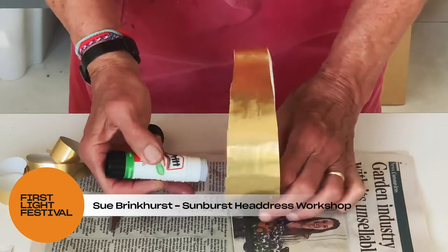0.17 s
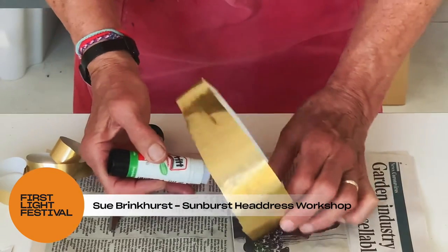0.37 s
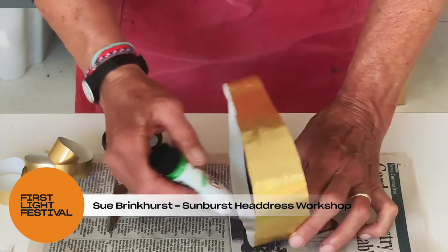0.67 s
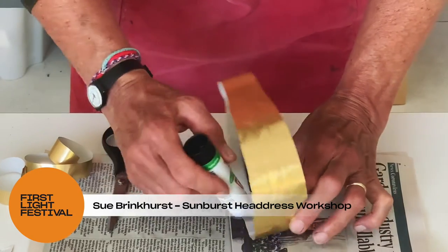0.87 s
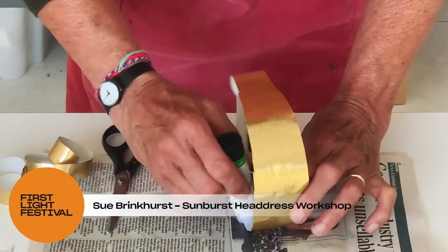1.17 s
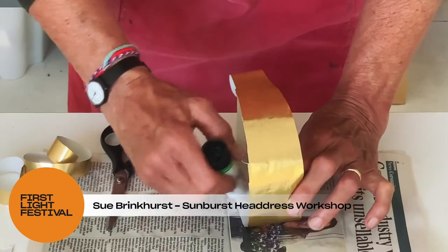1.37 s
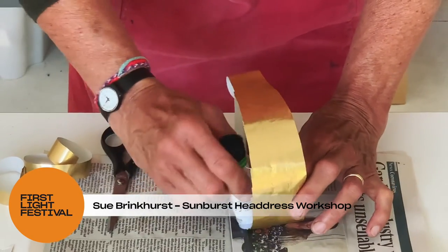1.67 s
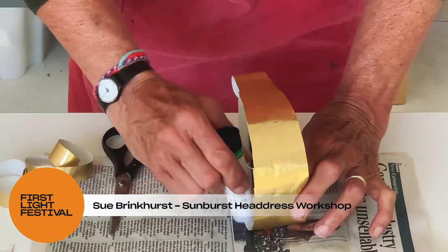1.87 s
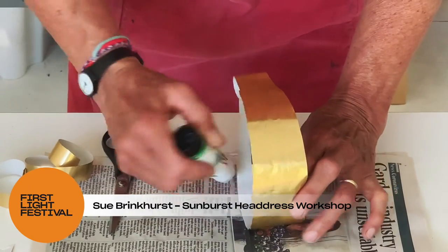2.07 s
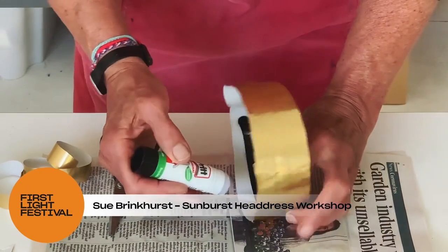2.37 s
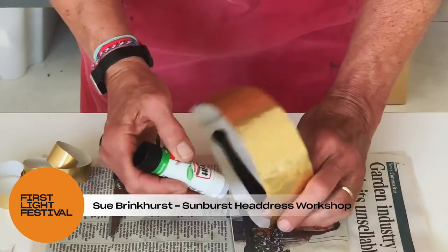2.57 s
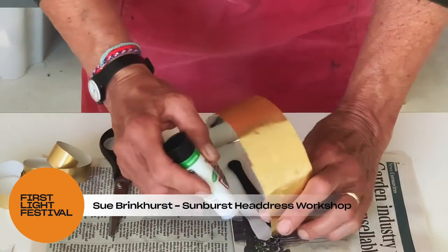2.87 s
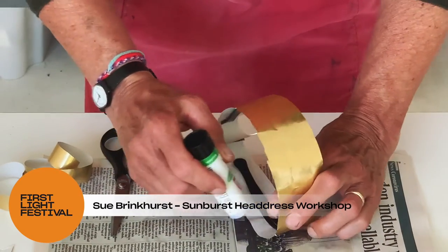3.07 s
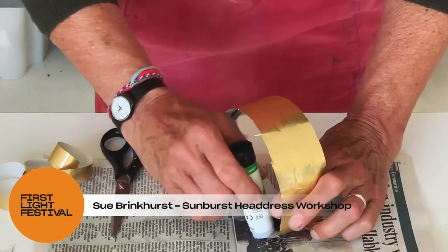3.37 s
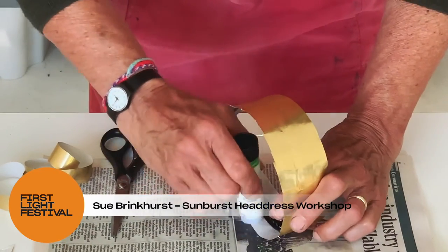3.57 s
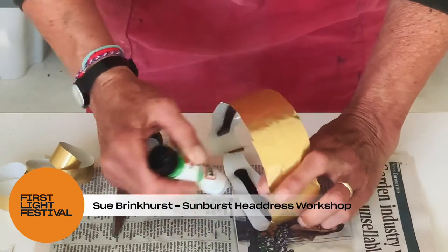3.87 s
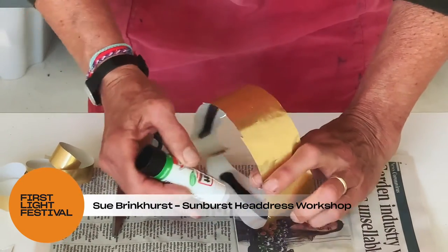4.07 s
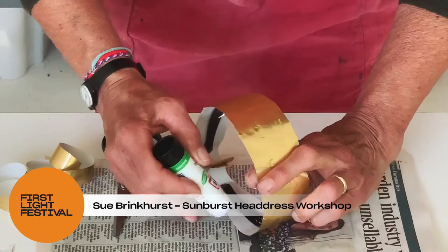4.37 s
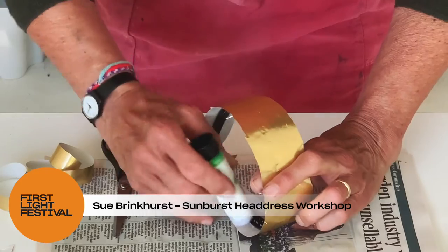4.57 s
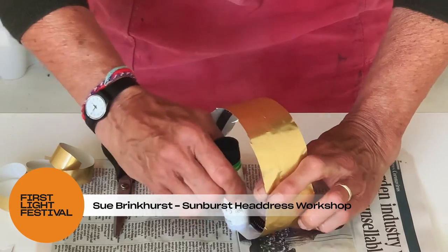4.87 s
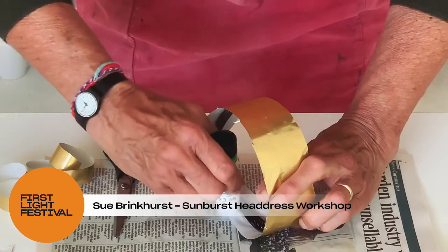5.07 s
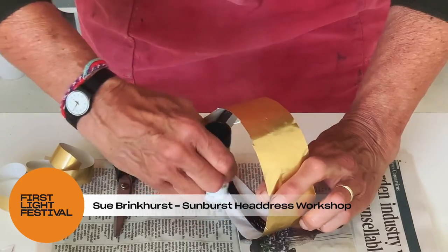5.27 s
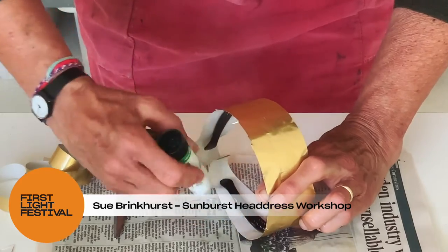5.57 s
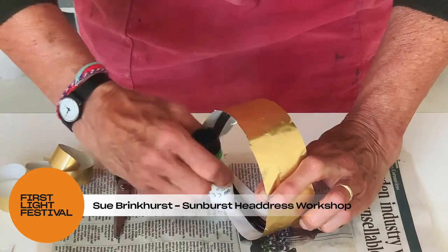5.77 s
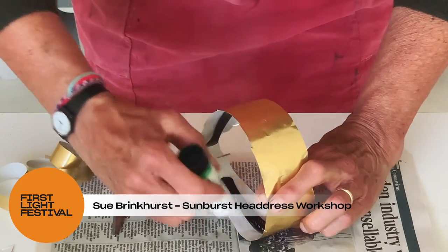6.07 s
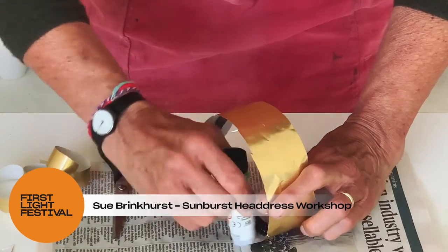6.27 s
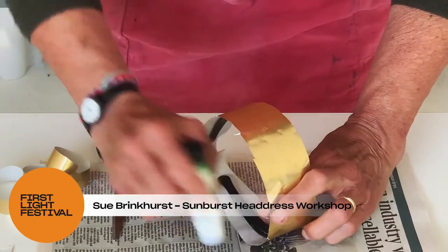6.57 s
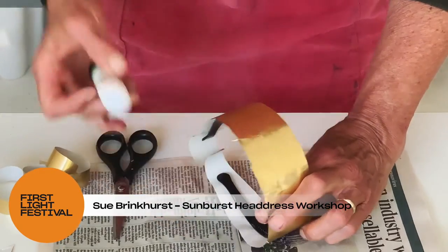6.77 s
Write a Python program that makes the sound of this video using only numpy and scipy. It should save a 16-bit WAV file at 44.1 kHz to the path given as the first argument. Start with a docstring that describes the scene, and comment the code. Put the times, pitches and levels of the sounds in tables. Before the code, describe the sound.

A headband covered in stiff metallic paper is handled on a table, heard by a close stereo microphone with short, lively indoor reflections. Crinkling opens loudly, thins to soft rubbing with muffled bumps, then returns as dense snapping and scraping. Later events are sparser: brief crackles, hollow plastic clicks, barely audible waxy wipes, a thin squeak and a firmer thump. A faint low hum and air noise continue underneath.

```python
"""Foil paper around a headband rustles, snaps and scrapes as a glue stick wipes its inside, on a table in a live room.
At first the stiff paper crackles and slides; hissing strokes of the stick and low table bumps follow, then a busy
run of snaps, with dull knocks of the rim. After a quieter spell comes a short burst of snaps, then the plastic case
clicks and faint strokes pass. Near the end come a narrow squeak, more bumps and a few last snaps and case clicks.
Paper, band, case and table are short dying tones, sliding is shaped noise, and a drone and air noise run throughout."""
import sys
import numpy as np
from scipy import signal
from scipy.fft import rfft, irfft, next_fast_len
from scipy.io import wavfile

SR = 44100
rng = np.random.default_rng(int(sys.argv[2]) if len(sys.argv) > 2 else 0)


def to_wav(sig):
    """Store sig (one row per channel, or 1-D mono) as 16-bit WAV at the path in sys.argv[1].

    Samples outside -1..1 are clipped; the rate is SR.
    """
    pcm = np.clip(np.atleast_2d(sig), -1, 1) * 32767
    pcm = np.round(pcm).astype(np.int16)
    wavfile.write(sys.argv[1], SR, pcm.T)  # frames by channels


N = 305118
TIME = np.arange(N) / SR


def from_db(db):
    """Turn decibels into a gain."""
    return np.exp(np.asarray(db) * np.log(10) / 20)


def rms_one(x):
    """Scale to unit power."""
    return x / np.sqrt(np.mean(x ** 2) + 1e-20)


def energy_one(x):
    """Scale to unit energy."""
    return x / np.sqrt(np.sum(x ** 2) + 1e-20)


def at_hz(points, hz):
    """Read a table between its rows, on a log-frequency axis."""
    f, value = np.transpose(points)
    return np.interp(np.log(hz), np.log(f), value)


def band(x, low, high):
    """Keep mainly the sound between two frequencies."""
    sos = signal.butter(2, [low, min(high, .48 * SR)], "band", fs=SR, output="sos")
    return signal.sosfilt(sos, x)


def half_octaves(low, count):
    """List half-octave bands as rows of lower edge, centre and upper edge."""
    return low * 2 ** ((np.arange(count)[:, None] + np.arange(3) / 2) / 2)


def drift(rate):
    """Wander slowly and randomly around zero with spread 1; a higher rate wanders faster."""
    step = 40  # samples between computed points
    r = np.exp(-2 * np.pi * step * rate / SR)
    slow = signal.lfilter([1], [1, -2 * r, r * r], rng.standard_normal(N // step + 1002))
    slow = slow[1000:]  # skip the filter's start-up
    return np.interp(np.arange(N) / step, np.arange(len(slow)), rms_one(slow))


def add(track, s, sound):
    """Mix a short sound into a track at a time in seconds."""
    start = min(max(0, int(s * SR)), N)
    track[start:start + len(sound)] += sound[:N - start]


def snap_ring(pitches, t60, spread_s):
    """A sharp sound comes in a few quick steps, each ringing one short-lived mode."""
    starts = spread_s * rng.exponential(1, (len(pitches), 1))
    age = np.maximum(TIME[:SR // 80] - starts + starts.min(), 0).astype("float32")
    tones = np.sin(2 * np.pi * pitches[:, None].astype("float32") * age)
    modes = tones * from_db(-60 * age / t60)
    return rng.normal(0, 1, len(pitches)) @ modes


# Sharp snaps of paper and, near 4.04 and 6.78 s, clicks of the plastic case. Each row: start in seconds,
# main pitch in Hz (of the loose flap, for paper), level in dB before mixing,
# treble slope in dB per octave, typical time over which its steps spread in seconds.
SHARP_SNAPS = [(0.0031, 2226, -29, 0.5, 0.0012), (0.0088, 3050, -33.5, 1.5, .0007),
               (0.0165, 3400, -43, -2, .003), (0.2236, 2320, -40, -11.5, .0003),
               (0.2452, 2470, -48.5, 4.5, 0.0013), (0.4326, 1310, -42, 3.5, 0.00073),
               (0.7536, 2800, -61, 1.5, .0015), (1.1449, 1070, -52, -23, 0.00085),
               (1.1963, 1440, -51, -13, 0.0012), (1.2583, 2540, -37.5, -32, 0.00042),
               (1.3448, 1230, -31, -11, .0015), (1.3612, 2070, -36.5, -11.5, 0.000416),
               (1.3758, 2610, -31.5, -0.5, 0.00053), (1.9131, 1270, -32.5, -28, 0.00037),
               (1.9165, 2230, -37, -22, 0.00138), (1.9553, 2470, -33, -21, 0.0016),
               (1.964, 2680, -40.5, -6.5, 0.0013), (1.9847, 1510, -36, -29, .001),
               (1.9885, 2220, -33, -30, .0015), (2.0616, 1160, -44, -5, .001), (2.171, 2930, -42, 4, .0005),
               (2.2131, 1440, -38.5, 1, 0.00071), (2.2498, 4020, -48.5, 8.5, .0005),
               (2.3442, 2036, -39, -2, 0.0012), (2.3636, 3140, -36.5, -7.5, .002),
               (2.4446, 900, -38.5, -13.5, 0.00046), (2.5035, 2270, -39.5, -4.5, 0.0011),
               (2.5247, 2210, -36, 5, 0.000772), (2.5302, 2390, -43.5, 3, 0.0018),
               (2.6288, 3940, -44, 2, 0.00078), (2.8037, 1050, -50, -1.5, .0006),
               (2.809, 1730, -50, -20, .0015), (2.9037, 3350, -58, 3.5, 0.00038),
               (3.3442, 1401, -56, -20, .002), (3.4096, 1180, -62, -21, .001),
               (3.4613, 1050, -68, -26.5, 0.0015), (3.4849, 1500, -56, -29, 0.0013),
               (3.547, 1357, -39, 1.5, 0.0012), (3.5545, 1290, -36, -2.5, 0.0015),
               (3.5600, 10100, -55, 14, .002), (3.5643, 900, -33.5, -3.5, .0015),
               (3.5697, 10360, -35.5, 7.5, .0006), (3.5759, 1240, -38, -19.5, 0.0012),
               (3.6497, 2300, -40, -13, .0015), (3.6559, 2490, -39.5, 2.5, .0005),
               (3.7932, 1250, -41.5, -11, .0007), (3.8265, 2540, -43, -9, .001),
               (3.9428, 971, -53.5, 2.5, .0015), (4.0393, 3950, -41.5, -4.5, 0.000202),
               (5.2146, 8140, -48.5, 14, .0008), (5.2175, 1065, -34.5, -2.5, .002),
               (5.2588, 4600, -42.5, 4, 0.0018), (5.2645, 3740, -52, 8.5, .0015),
               (5.371, 3020, -47, -6.5, 0.00094), (5.8443, 9850, -53, 5, .0015),
               (5.8952, 958, -45.5, 2.5, .0015), (6.1955, 1210, -46, -29.5, 0.001026),
               (6.1962, 2790, -46, -25, 0.0007), (6.4723, 2235, -43.5, -24, .001),
               (6.478, 2690, -54, -18.5, 0.0017), (6.5095, 2870, -68.5, -22, 0.00085),
               (6.6846, 8900, -80, 20.5, 0.0018), (6.7738, 3740, -39.5, 3, .001),
               (6.777, 4500, -41, 2.5, 0.000617), (6.7795, 2230, -38.5, -1, 0.0013)]
FLAP_BOOST_DB = 6.5  # extra level in a zone that holds the main pitch
TREBLE_FROM_HZ = 2590  # the treble slope starts here


def snaps(rows, ring_s=0.0017, ring_slope=1.0, flap_db=-3, gather=0.69):
    """Sharp snaps and clicks are broad cracks, longer in the lows, plus a knock at the main (flap) pitch."""
    out, t = np.zeros(N), TIME[:SR // 80]
    flap_t60 = .006  # seconds to fall by 60 dB
    # each zone: from Hz, to Hz, level in dB
    zones = [(637, 2045, -4.5), (1760, 4720, 0.07), (3608, 9760, -0.5), (9300, 14800, -7.0)]
    times, flap_hz, level_db, slope, steps_s = np.transpose(rows)
    flaps = np.array([energy_one(np.sin(2 * np.pi * hz * t) * from_db(-60 * t / flap_t60))
                      for hz in flap_hz])
    for low, high, zone_db in zones:
        # the knock rings in a zone that holds its pitch, and the modes there gather around it
        holds = ((low <= flap_hz) & (flap_hz < high))[:, None]
        pitches = np.linspace(low, high, num=20)
        pitches = pitches + gather * holds * (flap_hz[:, None] - pitches)
        t60 = ring_s * (2000 / low) ** ring_slope
        cracks = np.array([energy_one(snap_ring(p, t60, step_s))
                           for p, step_s in zip(pitches, steps_s)])
        with_flap = cracks + from_db(flap_db) * holds * flaps
        sounds = band(band(with_flap, low, high), low, high)
        octaves_up = max(0, np.log2(np.sqrt(low * high) / TREBLE_FROM_HZ))
        strengths = from_db(level_db + zone_db + slope * octaves_up + FLAP_BOOST_DB * holds[:, 0])
        for s, strength, sound in zip(times, strengths, sounds):
            add(out, s, strength * energy_one(sound))
    return out


LEAD_S = 0.0072  # the paper starts to stir this long before it slides
SWELL_SHARE, SAG_DB, RELEASE_DB_PER_S = 0.2, 5, 278.5  # share of the length, loss over it, fall after it


def rustle_envelope(length):
    """One slide of the paper swells roundly, sags a little, then dies away."""
    t = np.arange(-LEAD_S, length + 60 / RELEASE_DB_PER_S, 1 / SR)
    rise = np.minimum((t + LEAD_S) / (LEAD_S + SWELL_SHARE * length), 1)
    swell = np.sin(np.pi / 2 * rise) ** 2
    sag_db = SAG_DB * np.clip(t / length, 0, 1)
    release_db = RELEASE_DB_PER_S * np.maximum(t - length, 0)
    return swell * from_db(-sag_db - release_db)


# The band is turned or pressed and its paper slides. Each row: start in seconds, length in seconds,
# level in dB before mixing, tilt in dB per octave.
PAPER_SLIDES = [(0.0, 0.15, -42.5, 2), (0.195, 0.11, -43, 5), (0.3, .13, -40, 4), (0.434, 0.055, -48, 1),
                (0.637, 0.085, -56.5, 5.5), (1.094, 0.39, -64.5, -1), (1.328, 0.17, -57, -2),
                (1.649, 0.058, -63, 4.5), (1.935, 0.2, -50, -4.5), (2.099, 0.23, -48, 3),
                (2.304, 0.8, -61, -1), (2.542, 0.073, -39.5, 4), (2.621, 0.38, -66.5, -1.5),
                (2.854, 0.069, -66, 3.5), (3.32, 0.06, -67, -4), (3.544, 0.14, -38.5, 0),
                (3.7, 0.28, -63, -2), (3.922, 0.054, -53.5, -2.5), (4.066, 0.26, -64, -1.5),
                (4.268, 0.033, -61.5, 5), (4.627, 0.2, -66.5, 3.5), (4.881, 0.084, -57.5, 2),
                (5.113, 0.02, -63, 6.5), (5.214, 0.041, -45.5, 10), (5.274, 0.15, -48.5, 5),
                (5.577, 0.38, -68, -7), (5.816, 0.094, -50, 5.5), (5.937, 0.028, -52, 5),
                (6.227, 0.043, -56.5, 9.5), (6.516, 0.03, -52.5, 3), (6.686, 0.057, -49, 5),
                (6.802, 0.16, -56.5, -2.5)]
# Colour shared by all rustles. Each row: frequency in Hz, level in dB.
PAPER_COLOUR = [(300, -6.5), (450, 2), (750, -8), (1200, -6.5), (2100, -4.5), (3200, -6.5), (4500, -7),
                (6500, -7), (10000, -1), (14000, -5)]
TILT_PIVOT_HZ, ARCH_DB = 2730, 2  # the tilt turns about the pivot; both ends droop by the arch times octaves squared


def rustle(grains_per_s=600, size_db=2.0, clump_db=5.5, slide=0.68, patchy_db=6.0):
    """Tiny creases tick in clumps over the smooth slide of paper; the colour shifts as the sheet bends."""
    sizes_db = size_db * np.minimum(rng.exponential(1, N), 4)
    clumps_db = clump_db * np.minimum(drift(71), 1)
    grains = from_db(sizes_db + clumps_db) * (rng.random(N) < grains_per_s / SR)
    ticking = rms_one(grains * rng.standard_normal((2, N)))
    textures = ticking + slide * rng.standard_normal((2, N))
    envelopes = [rustle_envelope(row[1]) for row in PAPER_SLIDES]
    out = np.zeros(N)
    for k, (low, hz, high) in enumerate(half_octaves(250, count=12)):
        octaves, gain = np.log2(hz / TILT_PIVOT_HZ), np.zeros(N)
        for (s, _, level_db, tilt), envelope in zip(PAPER_SLIDES, envelopes):
            add(gain, s - LEAD_S, envelope * from_db(level_db + tilt * octaves))
        # neighbouring bands use different noise, and each comes and goes by itself
        patches = from_db(patchy_db * np.tanh(drift(42)))
        texture = rms_one(band(textures[k % 2], low, high) * patches)
        colour = from_db(at_hz(PAPER_COLOUR, hz) - ARCH_DB * octaves ** 2)
        out += texture * gain * colour
    return out


TICK_DB, TICK_SPREAD_DB = -16.5, 6.5  # level relative to the rustle's table level, and its spread either way
TICK_HZ = (940, 4800)  # lowest and highest flap pitch
TICK_STEP_S = .0005  # they give way almost at once


def stray_ticks(count=2):
    """Each rustle lets a few small creases go at random moments; returns rows as for the snaps."""
    rows = []
    lowest, highest = TICK_HZ
    for s, length, level_db, tilt in PAPER_SLIDES:
        for when, pitch, size in rng.random((count, 3)):
            hz = lowest * (highest / lowest) ** pitch
            tick_db = level_db + TICK_DB + TICK_SPREAD_DB * (2 * size - 1)
            rows.append((s + when * length, hz, tick_db, tilt, TICK_STEP_S))
    return rows


# Rough scraping tones; those near 5.3 s are resonances ringing on after snaps. Each row: start in seconds,
# length in seconds, first pitch in Hz, last pitch in Hz, level in dB before mixing.
ROUGH_TONES = [(0.064, 0.035, 550, 535, -46), (0.284, 0.19, 2170, 1850, -48.5),
               (0.314, 0.14, 1337, 1292, -59.5), (0.439, 0.05, 370, 330, -65),
               (2.077, 0.053, 440, 390, -52), (2.656, 0.19, 2060, 1700, -57.5),
               (2.682, 0.11, 620, 430, -59), (2.447, 0.05, 760, 640, -55.5),
               (2.798, 0.13, 1050, 1100, -63.5), (3.338, 0.036, 1600, 1500, -67),
               (3.402, 0.1, 1662, 1750, -67), (3.456, 0.047, 860, 1000, -63.5),
               (3.955, 0.049, 452, 565, -55), (4.273, 0.025, 2960, 3000, -59.5),
               (5.248, 0.21, 1130, 1250, -54), (5.278, 0.17, 4650, 4600, -53.5),
               (5.292, 0.16, 3800, 3700, -60)]


def rough_tones(slips_per_s=210, size_db=7.5, scatter=0.066, ring_cycles=22):
    """Uneven little pulses each ring a short tone, whose pitch moves from first to last."""
    out, t = np.zeros(N), TIME[:SR // 25]
    for s, length, first_hz, last_hz, level_db in ROUGH_TONES:
        gaps = rng.uniform(.2, 1.8, 80)
        sizes, detunes = rng.standard_normal((2, 80))
        for when, size, detune in zip(np.cumsum(gaps) / slips_per_s, sizes, detunes):
            if when < length:
                hz = (first_hz + (last_hz - first_hz) * when / length) * np.exp(scatter * detune)
                pulse = energy_one(np.sin(2 * np.pi * hz * t) * from_db(-60 * t * hz / ring_cycles))
                strength = from_db(level_db + size_db * size) * np.sqrt(SR / slips_per_s)
                add(out, s + when, pulse * strength)
    return out


# The rim of the band knocks dully on the table. Each row: start in seconds, pitch in Hz,
# level in dB before mixing.
RIM_KNOCKS = [(0.433, 444, -47), (1.3591, 917, -62), (1.3755, 918, -34.5), (1.38, 490, -47.5),
              (2.0618, 514, -45.5), (2.171, 804, -42), (2.3636, 777, -51.5), (2.4434, 682, -50),
              (2.6288, 584, -55.5), (3.4865, 616, -58), (5.2148, 453, -42.5), (6.478, 928, -37)]


def knocks(ring_s=0.015, spread_s=0.00084, lowest=0.58, highest=1.5):
    """Each knock rings a cluster of the band's low, quickly damped modes."""
    out = np.zeros(N)
    for s, hz, level_db in RIM_KNOCKS:
        ring = snap_ring(hz * np.linspace(lowest, highest, num=12), ring_s, spread_s)
        add(out, s, from_db(level_db) * energy_one(band(ring, hz * lowest, hz * highest)))
    return out


def moving_resonance(hz, width):
    """Noise in one resonance whose centre moves; it forgets its phase faster where it is wider."""
    cycles = np.cumsum(width) / SR
    knots = rng.standard_normal((2, SR // 10))
    along, across = [np.interp(cycles, np.arange(len(k)), k) for k in knots]
    phase = 2 * np.pi * np.cumsum(hz) / SR
    return rms_one(along * np.cos(phase) + across * np.sin(phase))


# The stick is wiped along. Each row: start in seconds, length in seconds, first hiss pitch in Hz,
# settled hiss pitch in Hz, settling time in seconds, width in Hz before the spread factor,
# level in dB before the judder and mixing.
STICK_STROKES = [(0.815, 0.97, 4095, 3620, 0.46, 464.5, -62), (1.438, 0.49, 3943, 3397, .3, 450.4, -57.5),
                 (3.02, 0.11, 6940, 7050, 0.051, 503, -69.5), (4.423, 0.46, 3470, 3280, 0.066, 294, -78.5),
                 (4.61, 0.27, 3970, 4330, 0.084, 398, -68.5), (4.981, 0.44, 6740, 7250, 0.15, 202, -73),
                 (5.529, 0.27, 4360, 4540, 0.055, 425, -65.5), (5.617, 0.205, 4270, 3660, 0.028, 59.4, -59)]


def glue_strokes(fade_s=0.041, judder_db=2.0, spread=3.3):
    """The waxy tip slides with a hiss whose pitch settles as it beds in; a narrow hiss is a squeak of grip."""
    out = np.zeros(N)
    for s, length, first_hz, settled_hz, settling_s, width, level_db in STICK_STROKES:
        t = np.arange(0, length, 1 / SR)
        hz = settled_hz + (first_hz - settled_hz) * np.exp(-t / settling_s)
        contact = np.clip(np.minimum(t, length - t) / fade_s, 0, 1)
        hiss = moving_resonance(hz, np.full(len(t), spread * width))
        add(out, s, hiss * contact * from_db(level_db))
    return out * from_db(judder_db * drift(39))


# The stick's plastic case clicks. Each row: start in seconds, level in dB before mixing.
STICK_CASE_CLICKS = [(4.0393, -45), (5.2146, -47.5), (5.2645, -46.5), (6.777, -42.5)]
# Tones of the case. Each row: pitch in Hz, strength in dB, time to fall by 60 dB in seconds.
CASE_TONES = [(2160, -13, 0.059), (2860, -6.5, 0.055), (3640, -6, 0.12), (3750, -9.5, 0.26),
              (3840, 9.5, 0.005), (4050, 1, 0.027), (4400, 9, 0.0062), (4570, -9, 0.077), (4870, -11, 0.05),
              (5560, -9, 0.03), (6030, -13, 0.03)]


def case_clicks():
    """The hollow plastic case rings on briefly in its own tones after a click."""
    out, t = np.zeros(N), TIME[:SR // 4]
    hz, mode_db, t60 = np.array(CASE_TONES).T[:, :, None]
    ring = (from_db(mode_db - 60 * t / t60) * np.sin(2 * np.pi * hz * t)).sum(axis=0)
    for s, level_db in STICK_CASE_CLICKS:
        add(out, s, from_db(level_db) * ring)
    return out


# Pressing down bumps the table. Each row: start in seconds, level in dB before mixing, low cut in Hz,
# contact cut-off (high cut) in Hz, time for the load to build in seconds.
TABLE_BUMPS = [(1.026, -24, 90.6, 173, 0.004), (1.588, -24.5, 86.5, 170, 0.0023),
               (3.333, -31.5, 105, 85, 0.011), (4.035, -52, 92, 109, 0.0024),
               (5.218, -44, 201, 403, 0.0027), (5.776, -27, 105, 272, 0.0016),
               (6.477, -21, 100, 480, 0.0012), (6.514, -29.5, 170, 480, 0.0012),
               (6.574, -34.5, 240, 400, 0.002), (6.683, -37, 91.6, 190, 0.0018)]
# Tones of the table top. Each row: pitch in Hz before small random detuning, strength in dB before
# random variation, time to fall by 60 dB in seconds.
TABLE_TONES = [(124, -2.5, 0.12), (152, -8, 0.15), (204, -6, 0.3), (250, -4, 0.07), (268, -2, 0.2),
               (341, -11, 0.22), (430, -8.5, 0.19), (500, -8, 0.19), (568, -10, 0.14), (630, -18, 0.1),
               (680, -23, 0.1), (918, -27, 0.2)]


def bumps(spot_db=2.5, detune=0.0085, settle_db=-8.5, settle_s=0.024, settle_loss_db=3, count=3):
    """Soft blows through the hand ring the table's low modes; a firmer contact reaches the higher ones."""
    out, t = np.zeros(N), TIME[:SR // 2]
    hz, mode_db, t60 = np.array(TABLE_TONES).T[:, :, None]
    for s, level_db, lowest_hz, contact_hz, build_s in TABLE_BUMPS:
        contact = np.vstack([signal.butter(2, contact_hz, fs=SR, output="sos"),
                             signal.butter(4, lowest_hz, "high", fs=SR, output="sos")])
        # the hand lands, then settles in uneven weaker touches
        delays = np.cumsum(settle_s * rng.uniform(.5, 1.5, count))
        settling = zip(delays, settle_db - settle_loss_db * np.arange(count))
        for late_s, touch_db in [(0.0021, 0.0081)] + list(settling):
            # each touch meets another spot and loads the modes differently
            spot, load = rng.standard_normal((2, len(TABLE_TONES), 1))
            strengths = from_db(mode_db + spot_db * spot - 60 * t / t60)
            modes = strengths * np.sin(2 * np.pi * hz * (1 + detune * load) * t)
            blow = modes.sum(axis=0) * (1 - np.exp(-t / build_s))
            add(out, s + late_s, from_db(level_db + touch_db) * signal.sosfilt(contact, blow))
    return signal.sosfilt(signal.butter(4, 950, fs=SR, output="sos"), out + 1e-18)


# How alike left and right are in diffuse sound. Each row: frequency in Hz, correlation.
LEFT_RIGHT_LIKENESS = [(50, 0.84), (150, 0.93), (350, 0.74), (700, 0.11), (1400, 0.069), (3000, 0.05),
                       (12000, 0.088)]


def diffuse(hz, pair):
    """Two unrelated signals become left and right; their mean keeps the level of the first."""
    alike = np.clip(at_hz(LEFT_RIGHT_LIKENESS, hz), -.5, .99)
    return pair[0] + np.sqrt((1 - alike) / (1 + alike)) * pair[1] * np.array([[1], [-1]])


# Tones of the room drone. Each row: pitch in Hz, distance in Hz to where it is 6 dB weaker,
# level in dB before wavering.
DRONE_TONES = [(51.6, 4.8, -76), (77, 2.4, -68), (106.7, 4.7, -52), (152.2, 8.6, -66), (215, 8.9, -76.5)]
# Noise of the still air. Each row: frequency in Hz, level in dB per Hz.
AIR_NOISE = [(25, -89), (70, -83), (125, -77), (180, -91.5), (290, -104), (450, -104), (700, -108),
             (1500, -112), (4000, -118), (8000, -123), (14000, -128), (16000, -140)]
DRONE_WAVER_DB, DRONE_WAVER_PER_S = 5.5, 3.8  # the drone comes in uneven lumps


def background():
    """A wavering low drone of narrow noise bands lies over faint air noise."""
    size = next_fast_len(N)
    hz = np.maximum(np.fft.rfftfreq(size, 1 / SR), 1)
    drone_power = 0
    for centre, width, level_db in DRONE_TONES:
        shape = 1 / (1 + ((hz - centre) / width) ** 2) ** 2
        drone_power = drone_power + from_db(level_db) ** 2 * 2 / (np.pi * width) * shape
    air_power = from_db(at_hz(AIR_NOISE, hz)) ** 2
    layers = []
    for power in (air_power, drone_power):
        spectrum = diffuse(hz, rfft(rng.standard_normal((2, size)))) * np.sqrt(power * SR / 2)
        layers.append(irfft(spectrum, size)[:, :N])
    air, drone = layers
    return air + drone * from_db(DRONE_WAVER_DB * np.minimum(drift(DRONE_WAVER_PER_S), 1))


# Reverberation. Each row: frequency in Hz, time to fall by 60 dB in seconds,
# level in dB relative to the other rows.
ROOM_DECAY = [(98.8, 0.38, -0.5), (343, 0.33, 2.5), (786, 0.62, -2), (2040, 0.36, 0.5), (4430, 0.5, 1),
              (7800, 0.26, 5), (12650, 0.088, 0)]


def room_response(build_s=0.000072):
    """Diffuse reflections build up quickly, then die away at a speed that depends on frequency."""
    t, out = TIME[:SR * 3 // 4], 0
    for low, hz, high in half_octaves(62, count=16):
        t60 = at_hz(np.array(ROOM_DECAY)[:, :2], hz)
        level_db = at_hz(np.array(ROOM_DECAY)[:, ::2], hz)
        noise = np.array([rms_one(v) for v in band(rng.standard_normal((2, len(t))), low, high)])
        strength = np.sqrt((high - low) / SR) * from_db(level_db - 60 * t / t60)
        out = out + diffuse(hz, noise) * strength
    out = out * (1 - np.exp(-t / build_s))
    return out / np.sqrt(np.sum(out.mean(axis=0) ** 2))


def place(x, room, direct_db, room_db, pan_db):
    """The direct sound comes on the left one sample sooner than on the right; the room follows."""
    direct = np.array([x, np.concatenate([[0], x[:-1]])]) * from_db(direct_db)
    echoes = signal.fftconvolve(x[None].astype("float32"), room.astype("float32"), axes=1)[:, :N]
    return (direct + echoes * from_db(room_db)) * from_db([[pan_db / 2], [-pan_db / 2]])


def scene():
    """Paper, stick and table share one room."""
    room = room_response()
    sharp = (snaps(SHARP_SNAPS + stray_ticks()) + knocks()) * from_db(20.5)
    rough = rustle() * from_db(-4.5) + rough_tones() * from_db(-8.0)
    cracks = place(sharp, room, direct_db=-1.0, room_db=-4.0, pan_db=0)
    paper = place(rough, room, direct_db=-1.5, room_db=-3.5, pan_db=0.35)
    stick = place(glue_strokes(), room, direct_db=-5, room_db=-9.5, pan_db=1.5)
    case = place(case_clicks(), room, direct_db=4, room_db=1.5, pan_db=1.5)
    table = place(bumps(), room, direct_db=4.5, room_db=0.0, pan_db=-2.5)
    return cracks + paper + stick + case + table + background()


# Treble peaks and dips of the whole sound. Each row: frequency in Hz, width in Hz, gain in dB.
TREBLE_SHAPE = [(8634, 1120, -34), (9800, 1800, 4.5), (11820, 1400, -20), (13240, 640, 9),
                (16000, 720, -25.5)]
CUTOFF_HZ = 15900


def record(dry):
    """Shape the treble; the top is cut."""
    for hz, width, gain_db in TREBLE_SHAPE:
        b, a = signal.iirpeak(hz, hz / width, fs=SR)
        dry = dry + (from_db(gain_db) - 1) * signal.lfilter(b, a, dry)
    return signal.sosfilt(signal.ellip(10, .1, 80, CUTOFF_HZ, fs=SR, output="sos"), dry)


dry = scene()
out = record(dry)
to_wav(out)
```